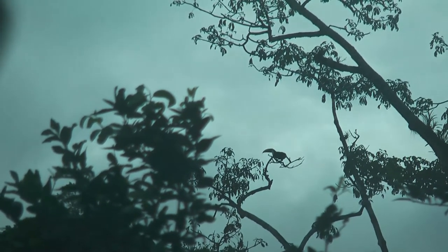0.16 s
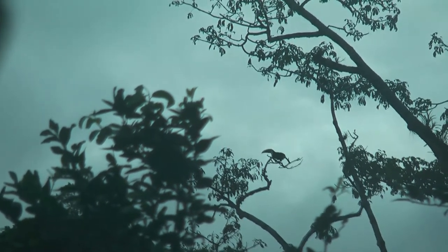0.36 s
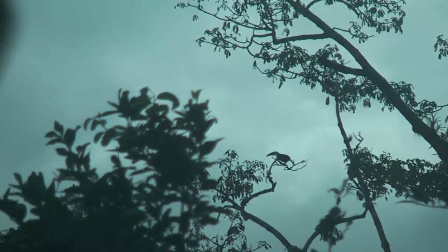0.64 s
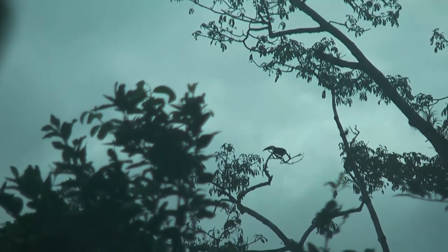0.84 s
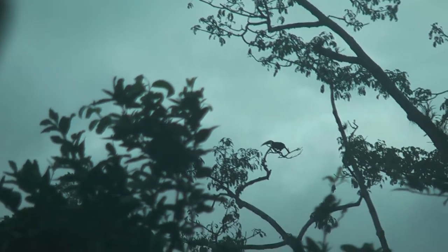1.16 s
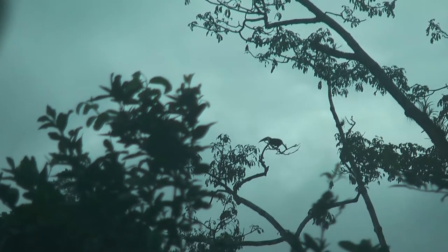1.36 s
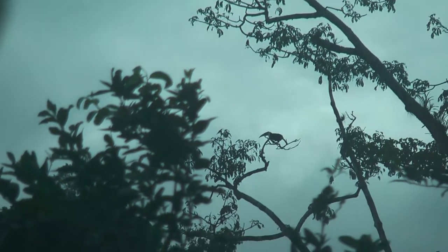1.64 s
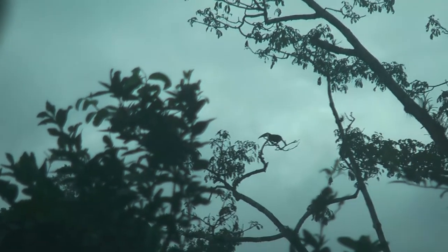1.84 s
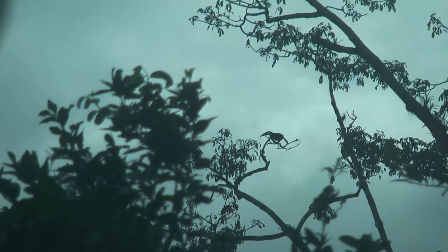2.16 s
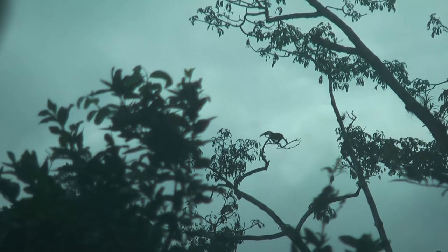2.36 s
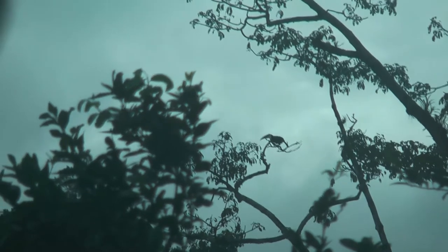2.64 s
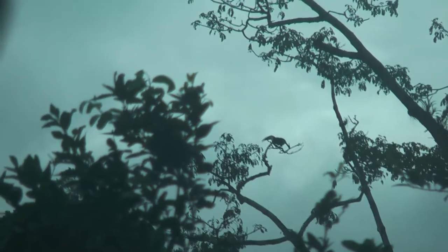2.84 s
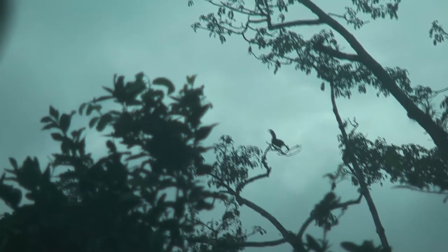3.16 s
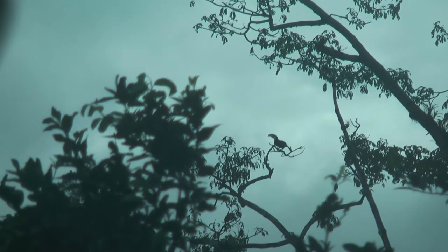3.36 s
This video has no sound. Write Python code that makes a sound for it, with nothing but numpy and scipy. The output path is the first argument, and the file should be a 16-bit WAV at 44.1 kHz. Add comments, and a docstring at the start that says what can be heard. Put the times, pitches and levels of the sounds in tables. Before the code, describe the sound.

A dense insect chorus shimmers throughout a dusk forest, with chirps and rasps coming and going; a bird whistles twice early, a cicada joins, and the bird calls again near the end, in wide open-air stereo.

```python
"""Dusk in a forest: from the start crickets, a buzz and katydids sing over a wash of air and far insects
(shaped noise) and faint steady tones (sines); chirps and rasps (throbbing resonant noise) come and go.
At 0.75 s a thin whistle (a gliding sine) arches once; a bird (gliding harmonics with a noise echo)
whistles two quick notes near 0.9 s, a longer one at 3.2 s and one at 3.5 s that the end cuts off.
From 1.2 s a cicada (a comb of overtones) joins and stays."""
import sys
import numpy as np
from scipy import signal
from scipy.io import wavfile
from scipy.ndimage import uniform_filter1d

SR = 44100
rng = np.random.default_rng(int(sys.argv[2]) if len(sys.argv) > 2 else 0)


def master(y):
    """Save y as 16-bit WAV."""
    cut = np.clip(np.atleast_2d(y).T, -1, 1)
    pcm = np.round(cut * 32767)  # scale
    wavfile.write(sys.argv[1], SR, pcm.astype(np.int16))


def elevation(decibels):
    """Turn decibel levels (scalar or array-like) into linear amplitude ratios."""
    levels = np.asarray(decibels, float)
    return 10 ** (levels / 20)


N = 154791
T = np.arange(N) / SR

# Air. Each row: frequency in Hz, relative density in dB.
WASH_SPECTRUM = [(12, -47), (20, -8.5), (102, -12.5), (129, -9.5), (155, -7), (259, -9), (311, -7.5),
                 (452, -5.5), (508, -6), (544, -2), (584, -7.5), (1020, -11), (1290, -11.5), (1780, -17),
                 (2590, -21), (2980, -24.5), (3750, -17), (4740, -24.5), (5200, -22), (6760, -39),
                 (11400, -120)]
# Far insects. Each row: frequency in Hz, relative density in dB.
CHORUS_SPECTRUM = [(4600, -57), (5200, -21), (5700, -14), (6000, -6), (6350, -5), (6800, -4), (7040, -30),
                   (7300, -8), (7780, 0), (7930, -14), (8040, -4), (8150, -4), (8500, -5), (8750, -10),
                   (8980, -20.5), (11000, -27.5), (13500, -23.5), (16000, -23.5)]
# Left-right likeness of shaped noise. Each row: frequency in Hz, correlation (1 = same).
LIKENESS = [(25, 1), (60, 0.56), (130, 0.083), (300, 0.4), (1200, 0.52), (4000, 0.49), (6200, 0.84),
            (8000, 0.96), (8900, 0.37), (9300, 0.93), (16000, 1)]
# Stereo lean of shaped noise. Each row: frequency in Hz, left minus right in dB.
LEAN_DB = [(25, 7), (60, 1.5), (150, -3.5), (950, 1.5), (6000, 3), (8300, -5), (9300, 0), (16000, -1.5)]
# Steady tones. Each row: mean frequency in Hz, level in dB.
HUM_TONES = [(464, -71), (552.5, -68), (839.7, -77), (976.5, -73), (1086, -73.5), (1325, -82.5),
             (1953, -82), (1988, -77), (2520, -79.5), (2649, -80.5), (3311, -83.5)]
# Steady trillers' mean pitches in Hz, one for each row of TRILLERS.
TRILLER_HZ = [5465, 7715, 8165, 8470, 6320, 6715]
# Steady trillers. Each row: resonance width in Hz, throbs per second, time of a throb peak in seconds,
# throb sharpness, level in dB, left minus right in dB, rms drift of the throb in turns.
TRILLERS = [(31, 6.55, 0.04, 0.48, -71.5, 0, 0.035), (94, 6.08, 0.021, 0.26, -60.5, -2, 0.087),
            (100, 13, .02, .4, -97, -13, .3), (104, 81, 0.024, 0.81, -65, 13.5, 0.28),
            (75, 12, 0.015, 0.38, -62, 3.5, 0.78), (100, 9.1, .02, 0.4, -104, -16, 0.54)]
# Nearest cricket. Each row: time in seconds, level in dB before CRICKET_GAIN_DB.
CRICKET_LEVEL = [(0.0, -54.5), (0.1, -50.5), (0.39, -72), (0.47, -69), (0.49, -74), (0.66, -56.5),
                 (1.58, -54.5), (1.63, -72), (1.84, -76), (1.87, -45.5), (1.93, -68), (2.05, -56),
                 (3.07, -54), (3.32, -63.5), (3.42, -52), (3.51, -90)]
# Buzz. Each row: time in seconds, level in dB outside the pauses.
BUZZ_LEVEL = [(0, -61), (1.5, -61), (2.55, -68), (2.68, -79), (3.51, -77)]
# Middles of the buzz's pauses in seconds.
BUZZ_PAUSES_S = [.15, .91, 1.28, 1.87, 2.12]
# Katydid. Each row: frequency in Hz, relative density in dB.
KATYDID_SPECTRUM = [(5590, -65), (9500, -10.5), (12500, 3), (15100, 3.5), (16000, -2.5)]
# Chirps. Each row: start in seconds, length in seconds, level after the rise in dB.
CHIRP_CALLS = [(-.03, 0.19, -50), (0.529, .2, -50.5), (1.492, 0.22, -51.5), (2.295, 0.196, -51),
               (2.863, 0.19, -52)]
# Rasps. Each row: start in seconds, length in seconds, level in dB before swell, edges and RASP_BODIES.
RASP_CALLS = [(-.25, .47, -52), (0.216, 0.35, -67), (0.715, 0.28, -64), (1.027, 0.46, -51.5),
              (1.785, .32, -65), (2.289, 0.485, -52)]
# Rasp resonances at the start of a call, in Hz, one for each row of RASP_BODIES.
RASP_START_HZ = [3550, 3780, 4100]
# Rasp resonances. Each row: width in Hz, relative level at start in dB, relative level at end in dB.
RASP_BODIES = [(114, -2, -17.5), (260, -5.5, -7), (260, -13.5, -7.5)]
# Thin whistle. Each row: time in seconds, pitch in Hz, level in dB.
WHISTLE_PATH = [(.75, 9120, -81), (.81, 9330, -61), (.85, 9800, -72), (.89, 10330, -81), (.95, 10500, -82),
                (1.06, 10750, -80), (1.11, 10550, -79), (1.16, 9860, -76), (1.2, 9400, -88)]
# Bird, one list a note. Each row: time in seconds, pitch in Hz, fundamental in dB, octave in dB,
# both before pan.
BIRD_NOTES = [
    [(.875, 1410, -83, -92), (.888, 1424, -60, -51), (.9, 1400, -55, -63), (.915, 1360, -78, -57)],
    [(.975, 1580, -64, -89), (.985, 1586, -47.5, -49), (.998, 1586, -42, -42.5), (1.01, 1560, -55, -48.5),
     (1.025, 1480, -60, -51), (1.042, 1400, -53, -55), (1.055, 1370, -91, -78)],
    [(3.205, 1634, -63, -79), (3.218, 1668, -51, -48), (3.232, 1696, -50, -56), (3.246, 1703, -44.5, -70),
     (3.27, 1705, -47, -50.5), (3.284, 1592, -41, -55), (3.296, 1498, -44, -49), (3.308, 1473, -43, -55),
     (3.35, 1469, -52, -50.5), (3.376, 1469, -43.5, -48.5), (3.39, 1473, -51, -64.5),
     (3.408, 1440, -39, -50), (3.42, 1390, -51, -59), (3.435, 1330, -64, -71), (3.45, 1360, -57, -59)],
    [(3.492, 1560, -65, -61), (3.502, 1570, -49, -54.5), (3.52, 1580, -37, -50)],
]
# Cicada clicks. Each row: time in seconds, clicks per second.
CICADA_CLICKS = [(1.25, 146), (1.65, 146.9), (1.74, 148.05), (2.3, 147.35), (2.5, 146.95), (2.95, 146.6),
                 (3.2, 146.4), (3.51, 146.25)]
# Cicada song. Each row: time in seconds, level in dB before CICADA_GAIN_DB and the overtone levels,
# roughness 0-1, posture 0-1.
CICADA_SONG = [(1.2, -73, 0.9, .3), (1.4, -57, 0.6, 0.33), (1.55, -49.5, .8, 0.1), (1.69, -56, .8, 0.4),
               (1.74, -53.5, 0.22, 0.24), (2.0, -52, 0.17, 0.14), (2.12, -54.5, 0, .01),
               (2.27, -50, .15, 0.26), (2.32, -50.5, .75, 0.24), (2.6, -47.5, 0.6, 0.85),
               (2.68, -49.5, 0.08, 0.85), (3.0, -48, 0.17, 0.95), (3.25, -50, 0.35, 0.9),
               (3.51, -50.5, 0.5, 0.17)]
# Cicada overtones, counted up from FIRST_ORDER. Each row: relative level in dB in posture 0, in posture 1.
CICADA_OVERTONES = [(-22, -19), (0, -27), (-6.5, -5.5), (-7, 3.5), (9.5, -22.5), (-4.5, -4.5), (-3, -18),
                    (-2, 1.5), (-5, -9), (-11, -11), (-16, -20)]

WASH_DB, WASH_PATCHY_DB = -55, 1.0
CHORUS_DB, CHORUS_PATCHY_DB = -52, 0.63
HUM_WAVER_RMS_HZ = 1.516
SPREAD = 0.57  # strength of each ear's own noise against the shared noise
CRICKET_HZ, CRICKET_WIDTH_HZ, CRICKET_PAN_DB, CRICKET_GAIN_DB = 8342, 43, 7.5, -0.5
CRICKET_PER_S, CRICKET_FIRST_S, CRICKET_SHARP = 27.8, 0.016, 0.43
BUZZ_HZ, BUZZ_WIDTH_HZ, BUZZ_HALF_PAUSE_S = 7180, 120, 0.04
KATYDID_DB, KATYDID_PER_S, KATYDID_FIRST_S, KATYDID_SHARP = -71, 20.05, 0.03, 1.7
CHIRP_LOW_HZ, CHIRP_HIGH_HZ, CHIRP_WIDTH_HZ = 5770, 6010, 140
CHIRP_PER_S, CHIRP_SHARP, CHIRP_SWELL_DB, CHIRP_RISE_S = 70.5, 0.52, -10, 0.056
RASP_START_PER_S, RASP_END_PER_S, RASP_SHARP = 43, 32, 0.14
RASP_SWELL_DB, RASP_EDGE_S = -9.5, 0.09
RASP_CLIMB = 0.02  # share by which the resonances rise in a call
BIRD_THIRD_DB, BIRD_PAN_DB = -21, 5.5
ECHO_DB, ECHO_T60_S, ECHO_GAP_S = -6, 0.64, 0.012
FIRST_ORDER, CICADA_GAIN_DB, CICADA_PAN_DB = 39, -5, -0.1
CICADA_WANDER_RMS_DB, CICADA_SMEAR_HZ = 1.6, 90


def evened(x):
    """Scales to rms 1."""
    return x / np.sqrt(np.mean(x ** 2) + 1e-20)


def read(points, hz):
    """Reads a table on a log-frequency axis."""
    f, value = np.transpose(points)
    return np.interp(np.log(hz + 1), np.log(f + 1), value)


def curve(rows):
    """Columns of a table joined over time."""
    s, *cols = np.transpose(rows)
    return [np.interp(T, s, c) for c in cols]


def tone(hz):
    """Sine of rms 1 along a pitch in Hz."""
    return 2 ** .5 * np.sin(2 * np.pi * np.cumsum(hz + 0 * T) / SR)


def slow(top_hz, count=1):
    """Slow chance: sines from 0.3 Hz to top_hz in random phase, rms 1."""
    f = np.geomspace(.3, top_hz, num=12)[:, None]
    t = T[::64]
    phase = rng.random((count, 12, 1))
    waves = np.sin(2 * np.pi * (f * t + phase)) / f ** .5
    return np.array([np.interp(T, t, evened(row)) for row in waves.sum(1)])


def placed(x, pan_db):
    """Leans a sound to the left by pan_db."""
    return x * elevation(np.array([[pan_db / 2], [-pan_db / 2]]))


def fuzzy(hz, width_hz, pan_db, pure=0.):
    """A wing ringing at hz, scraped irregularly: noise through a steep resonance, placed left or right."""
    r = np.exp(-np.pi * abs(width_hz) / SR)
    z = rng.standard_normal((3, N)) + 1j * rng.standard_normal((3, N))
    z = signal.lfilter([1], np.convolve([1, -r], [1, -r]), z)
    z = z / np.sqrt(np.mean(abs(z) ** 2))
    ears = pure + z[0] + SPREAD * z[1:]  # pure: strength of the clean tone in the scrape
    carrier = np.exp(2j * np.pi * np.cumsum(hz + 0 * T) / SR)
    return placed(evened((ears * carrier).real), pan_db)


def throb(turns, sharp):
    """One swell of loudness in each turn, rms 1."""
    return evened(np.exp(sharp * np.cos(2 * np.pi * turns)))


def gate(start, length, edge_s):
    """Progress 0-1 through a call, and a switch with soft edges."""
    along = np.clip((T - start) / length, 0, 1)
    on = np.clip(np.minimum(T - start, start + length - T) / edge_s, 0, 1)
    return along, on


def shaped(spectrum, patchy_db):
    """Noise with a given spectrum, drifting patches and a left-right likeness set by frequency, rms 1."""
    frames, hz = N // 256 + 5, np.fft.rfftfreq(1024, 1 / SR)
    a, b, c, d, patches = rng.standard_normal((frames, 513, 5)).T
    patches = uniform_filter1d(patches, size=10, axis=0)
    patches = evened(uniform_filter1d(patches, size=14, axis=1))
    same = np.clip(read(LIKENESS, hz), -1, 1)[:, None]
    lean = elevation(read(LEAN_DB, hz)[:, None] / 2)
    left = a + 1j * b
    right = same * left + np.sqrt(1 - same ** 2) * (c + 1j * d)
    z = np.array([left * lean, right / lean])
    z = z * elevation(read(spectrum, hz)[:, None] + patchy_db * patches)
    return evened(signal.istft(z, nperseg=1024, noverlap=768)[1][:, :N])


def wash():
    """Air: broad noise, strongest in the lows and mids."""
    return elevation(WASH_DB) * shaped(WASH_SPECTRUM, WASH_PATCHY_DB)


def chorus():
    """Far insects blurred into noise bands."""
    return elevation(CHORUS_DB) * shaped(CHORUS_SPECTRUM, CHORUS_PATCHY_DB)


def hum():
    """Faint steady tones: sines that waver a little in pitch."""
    drifts = slow(2.92, count=len(HUM_TONES))
    return sum(elevation(db) * tone(hz + HUM_WAVER_RMS_HZ * drift)
               for (hz, db), drift in zip(HUM_TONES, drifts))


def trillers():
    """Steady trills: wing tones mixed with narrow noise, each throbbing at its own rate."""
    out = np.zeros((2, N))
    for hz, (width_hz, per_s, first_s, sharp, db, pan_db, drift) in zip(TRILLER_HZ, TRILLERS):
        ring = fuzzy(hz + 12 * slow(3)[0], width_hz, pan_db, pure=0.92)
        beat = throb(per_s * (T - first_s) + drift * slow(2)[0], sharp)
        out += elevation(db) * ring * beat
    return out


def cricket():
    """Nearest cricket: a throbbing wing resonance, coming and going."""
    beat = throb(CRICKET_PER_S * (T - CRICKET_FIRST_S) + 0.065 * slow(2.2)[0], CRICKET_SHARP)
    ring = fuzzy(CRICKET_HZ + 9 * slow(3)[0], CRICKET_WIDTH_HZ, CRICKET_PAN_DB, pure=0.52)
    return elevation(curve(CRICKET_LEVEL)[0] + CRICKET_GAIN_DB) * beat * ring


def buzz():
    """A wide buzz: resonant noise without a throb that pauses briefly."""
    going = np.prod([np.clip(abs(T - s) / BUZZ_HALF_PAUSE_S, 0, 1) ** 3 for s in BUZZ_PAUSES_S], axis=0)
    return elevation(curve(BUZZ_LEVEL)[0]) * going * fuzzy(BUZZ_HZ, BUZZ_WIDTH_HZ, 0.5)


def katydid():
    """Katydid high in the treble: noise in sharp regular throbs."""
    beat = throb(KATYDID_PER_S * (T - KATYDID_FIRST_S), KATYDID_SHARP)
    return elevation(KATYDID_DB) * beat * shaped(KATYDID_SPECTRUM, 1.2)


def chirps():
    """Quick wing strokes whose pitch and strength climb at the start of each chirp."""
    rise, level = np.zeros((2, N))
    for start, length, db in CHIRP_CALLS:
        on = gate(start, length, 0.0054)[1]
        up = np.clip((T - start) / CHIRP_RISE_S, 0, 1)
        rise += up * (on > 0)
        level += on * elevation(db + CHIRP_SWELL_DB * (1 - up))
    hz = CHIRP_LOW_HZ + (CHIRP_HIGH_HZ - CHIRP_LOW_HZ) * rise
    return level * throb(CHIRP_PER_S * T, CHIRP_SHARP) * fuzzy(hz, CHIRP_WIDTH_HZ, -0.43, pure=0.67)


def rasps():
    """Slowing strokes; the lowest resonance fades and the highest opens up as each rasp swells."""
    progress, level = np.zeros((2, N))
    for start, length, db in RASP_CALLS:
        along, on = gate(start, length, RASP_EDGE_S)
        progress += along * (on > 0)
        level += on * elevation(db + RASP_SWELL_DB * (1 - along) ** 3)
    per_s = RASP_START_PER_S + (RASP_END_PER_S - RASP_START_PER_S) * progress
    beat = throb(np.cumsum(per_s) / SR, RASP_SHARP)
    body = np.zeros((2, N))
    for hz, (width_hz, start_db, end_db) in zip(RASP_START_HZ, RASP_BODIES):
        ring = fuzzy(hz * (1 + RASP_CLIMB * progress), width_hz, 1.0)
        body += elevation(start_db + (end_db - start_db) * progress) * ring
    return level * beat * body


def whistle():
    """One thin high whistle: a sine arching up and down."""
    hz, db = curve(WHISTLE_PATH)
    on = (T > WHISTLE_PATH[0][0]) * (T < WHISTLE_PATH[-1][0])
    return on * elevation(db) * tone(hz)


def echoed(dry):
    """Echo from the trees: convolution with decaying noise, partly shared by the ears."""
    t = T[:SR]
    tail = rng.standard_normal(SR) + 0.85 * rng.standard_normal((2, SR))
    tail = tail * elevation(-60 * t / ECHO_T60_S) * (t > ECHO_GAP_S)
    dull = signal.sosfilt(signal.butter(2, 2200, fs=SR, output="sos"), tail)
    tail = dull + (tail - dull) * elevation(-60 * t / 0.34)  # leaves swallow the treble sooner
    return signal.fftconvolve(dry[None], tail / np.linalg.norm(tail[0]), axes=1)[:, :N]


def bird():
    """Whistled notes: a gliding fundamental with two overtones, smeared by the trees."""
    dry = np.zeros(N)
    for note in BIRD_NOTES:
        hz, db, octave_db = curve(note)
        on = (T > note[0][0]) * (T < note[-1][0])
        # the third harmonic weakens further where the octave is below the fundamental
        third_db = octave_db + BIRD_THIRD_DB + 2 * np.minimum(octave_db - db, 0)
        dry += on * (elevation(db) * tone(hz) + elevation(octave_db) * tone(2 * hz) + elevation(third_db) * tone(3 * hz))
    return placed(dry, BIRD_PAN_DB) + elevation(ECHO_DB) * echoed(dry)


def cicada():
    """Regular clicks heard as a comb of overtones; when rough, each line smears into noise."""
    per_s = curve(CICADA_CLICKS)[0]
    db, rough, posture = curve(CICADA_SONG)
    rough, turns = np.clip(rough, 0, 1), np.cumsum(per_s) / SR
    wander = slow(4.87, count=len(CICADA_OVERTONES))
    out = np.zeros((2, N))
    for k, (a_db, b_db) in enumerate(CICADA_OVERTONES):
        order = FIRST_ORDER + k
        line = 2 ** .5 * np.cos(2 * np.pi * (order * turns + 0.55 * rng.random()))
        clean = placed(line, CICADA_PAN_DB)
        smeared = fuzzy(order * per_s, CICADA_SMEAR_HZ, CICADA_PAN_DB)
        level_db = a_db + (b_db - a_db) * posture + CICADA_WANDER_RMS_DB * wander[k]
        out += elevation(level_db) * (np.sqrt(1 - rough) * clean + np.sqrt(rough) * smeared)
    return elevation(db + CICADA_GAIN_DB) * (T > CICADA_SONG[0][0]) * out


def scene():
    """All singers over the wash."""
    insects = trillers() + cricket() + buzz() + katydid() + chirps() + rasps() + cicada()
    return wash() + chorus() + hum() + insects + whistle() + bird()


def top_cut(x):
    """Nothing passes above the cut-off."""
    return signal.sosfilt(signal.butter(12, 15800, fs=SR, output="sos"), x)


def record(dry):
    """Returns the finished stereo mix: the scene passed through top_cut(), with the treble ending at 15.8 kHz."""
    return top_cut(dry)


dry = scene()
out = record(dry)
master(out)
```